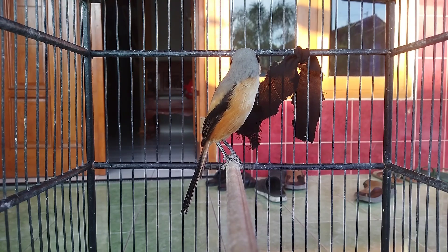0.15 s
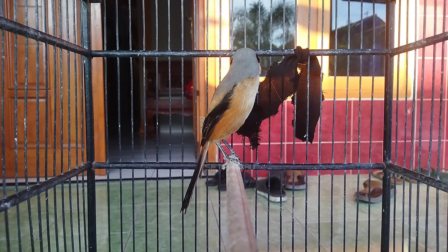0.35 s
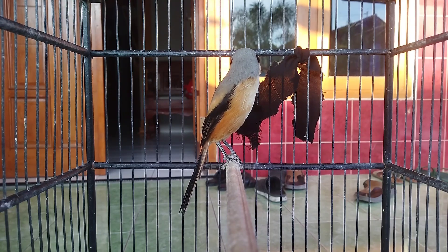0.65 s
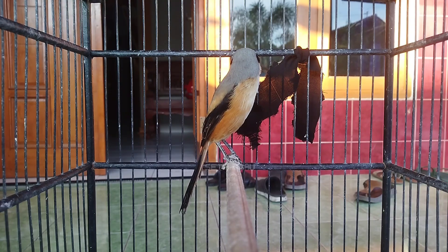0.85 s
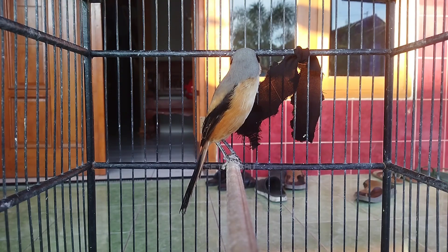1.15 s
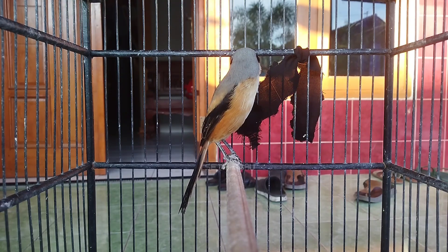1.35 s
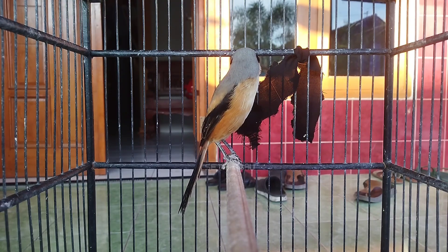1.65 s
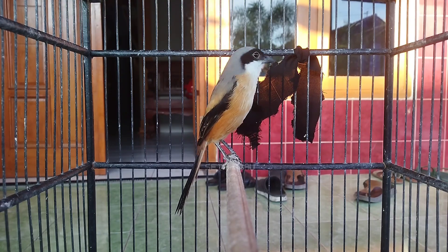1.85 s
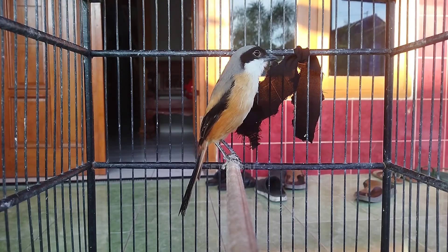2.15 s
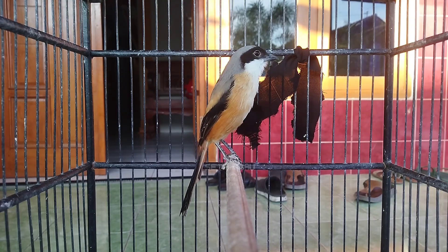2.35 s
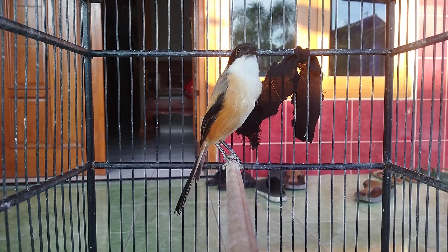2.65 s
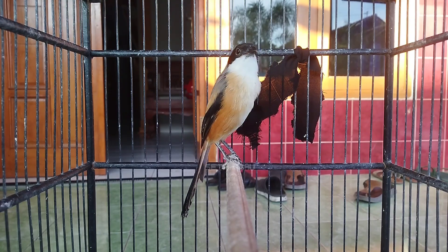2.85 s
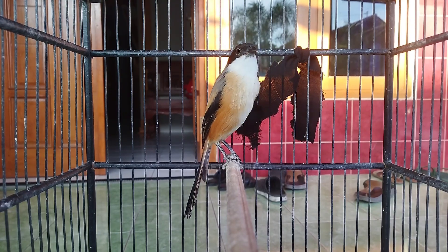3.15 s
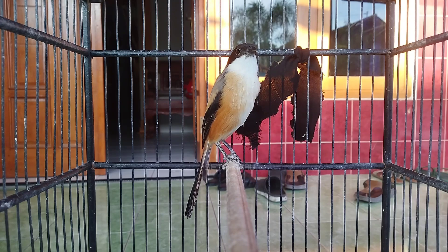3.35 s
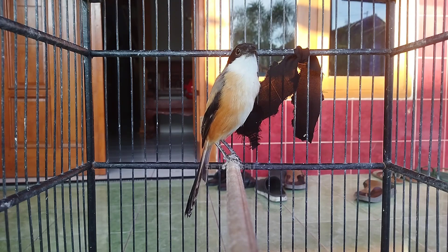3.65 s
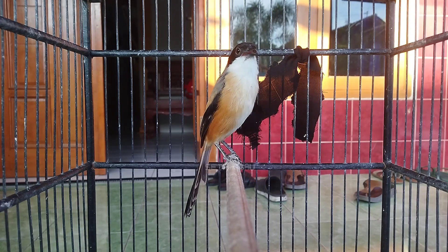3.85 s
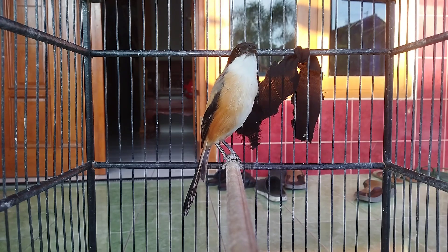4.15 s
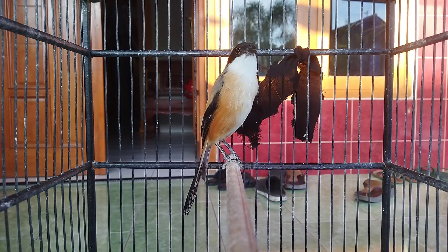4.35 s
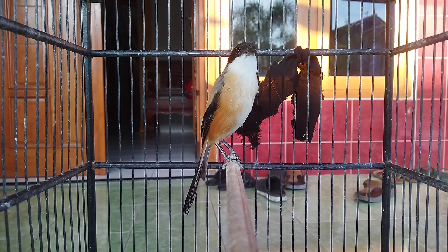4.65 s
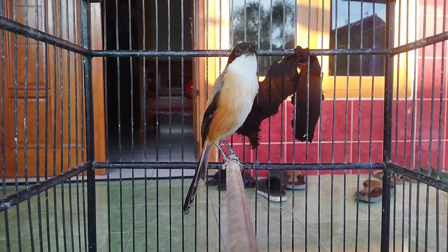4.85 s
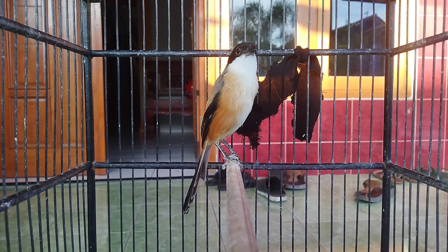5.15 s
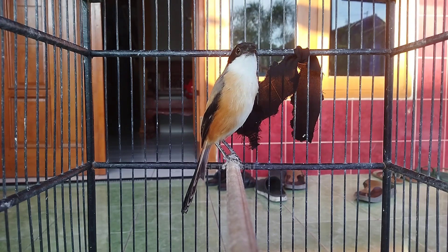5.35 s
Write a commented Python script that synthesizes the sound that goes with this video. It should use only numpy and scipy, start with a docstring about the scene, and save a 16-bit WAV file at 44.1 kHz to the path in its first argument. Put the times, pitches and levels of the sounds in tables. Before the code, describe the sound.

Beside a cage on a hard-walled porch, a low distant rumble runs throughout. A brief fizzing puff comes first, then soft dove notes from across the yard, a second sharper puff during a long rolled coo, and one last coo. Then the shrike, close and loud, gives two short harsh rasps, each ending in a rattle. Tiny clicks, feather rustles and very faint far cheeps fill the gaps.

```python
"""A caged shrike on a house porch gives two harsh rasps: each snaps open on a clear note, turns chaotic and
ends in a rattle. They are built from irregular syrinx pulses, coloured by a closing throat.
Before them come two puffs of filtered noise, like a mist sprayer, and four soft arched dove notes.
Clicks, feather rustles and far cheeps are shaped bands of noise over a low neighbourhood rumble.
The porch walls answer the rasps, puffs and clicks; the dove is heard across the yard."""
import sys
import numpy as np
from scipy import signal
from scipy.fft import rfft, irfft, next_fast_len
from scipy.io import wavfile
from scipy.ndimage import uniform_filter1d, map_coordinates

SR = 44100
rng = np.random.default_rng(int(sys.argv[2]) if len(sys.argv) > 2 else 0)


def file_out(sig):
    """Save sig as 16-bit WAV at sys.argv[1]."""
    # one column per channel
    cols = np.atleast_2d(sig).T
    # limit, then scale
    lim = np.clip(cols, -1, 1)
    pcm = np.round(lim * 32767).astype(np.int16)
    wavfile.write(sys.argv[1], SR, pcm)


N = 242991  # length of the scene in samples

# How long the porch walls ring. Each row: frequency in Hz, time to die by 60 dB in seconds.
PORCH_DECAY = [(500, .4), (1500, 0.45), (2800, 0.43), (3900, 0.45), (6000, 0.3), (13000, 0.39),
               (15500, 0.18)]


def amp(db):
    """Decibels to gain."""
    return 10 ** (np.asarray(db) / 20)


def unit(x):
    """Scale to rms 1."""
    return x / np.sqrt(np.mean(x ** 2) + 1e-20)


def along(points, hz):
    """Read a curve of (Hz, value) points on a log frequency axis."""
    f, v = np.transpose(points)
    return np.interp(np.log(hz + 1), np.log(f), v)


def add(track, s, x):
    """Mix x into the track from time s in seconds."""
    start = max(round(s * SR), 0)
    part = track[..., start:start + x.shape[-1]]
    part += x[..., :part.shape[-1]]


def wobble(rate, size):
    """A smooth random curve with rate knots a second."""
    knots = rng.standard_normal(int(size * rate / SR) + 4)
    return map_coordinates(knots, [np.arange(size) * rate / SR])


def fade(t, edge):
    """Soft start and end, each edge seconds long."""
    return np.clip(np.minimum(t - t[0], t[-1] - t) / edge, 0, 1)


def ramp(t, length):
    """Rises from 0 to 1 over the length, then stays."""
    return np.clip(t / length, 0, 1)


def filtered(x, response):
    """Multiply the spectrum of x by a response of frequency."""
    size = x.shape[-1]
    m = next_fast_len(size + SR // 4)
    return irfft(rfft(x, m) * response(np.fft.rfftfreq(m, 1 / SR)), m)[..., :size]


def resonate(x, spectrum, size=2048):
    """Minimum-phase colour: every pulse rings after it strikes, never before."""
    cepstrum = irfft(np.log(amp(along(spectrum, np.fft.rfftfreq(size, 1 / SR)))))
    # folding the cepstrum forward in time makes the filter causal
    cepstrum[1:size // 2] *= 2
    cepstrum[size // 2 + 1:] = 0
    ringing = irfft(np.exp(rfft(cepstrum)))
    return signal.fftconvolve(x, ringing)[:len(x)]


def band(size, centre_hz, octaves):
    """Stereo noise of rms 1 in a bell-shaped band."""
    noise = rng.standard_normal((2, size))
    return unit(filtered(noise, lambda f: np.exp(-(np.log2((f + 1) / centre_hz) / octaves) ** 2)))


def echo(x, decay, delay):
    """A diffuse stereo tail of noise in which each frequency dies at its own speed."""
    hz, t, z = signal.stft(rng.standard_normal((2, SR)), SR, nperseg=256)
    dying = z * amp(-60 * t / along(decay, hz)[:, None])
    tail = signal.istft(dying, SR, nperseg=256)[1]
    tail = np.pad(tail / np.linalg.norm(tail[0]), ((0, 0), (round(delay * SR), 0)))
    return signal.fftconvolve(np.atleast_2d(x), tail, axes=1)[:, :N]


def steady(x, size=700):
    """Even out slow swells, keeping the fine grain."""
    return x / np.sqrt(np.abs(uniform_filter1d(x ** 2, size)) + 1e-12)


def neighbourhood(level_db=-57.5, swell_db=1):
    """Distant traffic rumble, gently swelling, under a faint even hiss: noise with partly alike sides."""
    # Colour of the air, relative. Each row: frequency in Hz, level in dB.
    air_colour = [(15, -74), (25, -37), (48, -26), (87, -3.5), (141, 0), (301, -8.5), (344, -9.5),
                  (394, -8), (659, -19), (2000, -24), (5000, -34), (5730, -33.5), (7110, -38.5),
                  (9570, -33), (16000, -37)]
    # How far left and right move together. Each row: frequency in Hz, likeness from -1 to 1.
    likeness = [(60, 0.91), (180, 0.83), (550, 0.49), (1650, -0.08), (4970, 0.37), (15000, -0.37)]
    # Course of the rumble against the hiss. Each row: time in seconds, level in dB.
    rumble_level = [(0, 2), (.55, 1.5), (.7, 0.5), (5.5, -.5)]

    def mid_side(f):
        angle = np.arccos(np.clip(along(likeness, f), -1, 1)) / 2
        return amp(along(air_colour, f)) * [np.cos(angle), np.sin(angle)]

    mid, side = filtered(rng.standard_normal((2, N)), mid_side)
    air = unit(np.array([mid + side, mid - side]))
    rumble = filtered(air, lambda f: 1 / (1 + (f / 600) ** 4))
    hiss = air - rumble
    swell = np.interp(np.arange(N) / SR, *np.transpose(rumble_level)) + swell_db * wobble(8.1, N)
    return amp(level_db) * (rumble * amp(swell) + hiss)


def far_birds(cheep_s=.21):
    """Cheeps blurred by distance into narrow bands, and one thin high lisp from another small bird."""
    # Distant cheeps. Each row: start in seconds, level in dB, pitch in Hz.
    cheeps = [(.03, -73.5, 5700), (.24, -74.5, 5650), (.70, -76, 5800), (.78, -73.5, 3520),
              (.97, -75, 5720), (1.80, -74.5, 5720), (2.08, -75, 5780), (2.32, -74.5, 5800),
              (3.18, -76.5, 5750), (4.34, -77, 5570), (4.56, -76, 5590), (4.78, -75, 5750),
              (5.10, -78, 5650), (5.40, -75.5, 5720)]
    lisp_at_s, lisp_s, lisp_db, lisp_fade_db_per_s = 2.033, 0.15, -62.5, 70
    out, size = np.zeros((2, N)), round(cheep_s * SR)
    for s, db, hz in cheeps:
        add(out, s, amp(db) * band(size, hz, octaves=0.062) * np.sqrt(np.abs(np.hanning(size))))
    t = np.arange(0, lisp_s, 1 / SR)
    lisp = band(len(t), 10000, octaves=0.26) * fade(t, 0.023)
    add(out, lisp_at_s, amp(lisp_db - lisp_fade_db_per_s * t) * lisp)
    return out


def puffs(sputter_db=2.0, spread_db=-5, porch_db=-12):
    """Short sputtering jets of mist: the fine fizz fades with the pressure while the lower rush holds better."""
    # Each row: start in seconds, length in seconds, fizz level in dB, rush level in dB,
    # surge (or, if negative, lag) of the opening jet's fizz in dB.
    puff_rows = [(0.15, .118, -42.5, -51, -4.5), (1.475, .119, -40, -47.5, 3.5)]
    # Relative colour of the fine fizz. Each row: frequency in Hz, level in dB.
    fizz_colour = [(3000, -31), (4700, -6.5), (6500, -8), (7900, -14), (9200, -7.5), (11200, -11),
                   (12000, 2.5), (12700, -7.5), (13600, -1.5), (15400, -8)]
    # Relative colour of the lower rush. Each row: frequency in Hz, level in dB.
    rush_colour = [(120, -38), (400, -5), (1100, -8), (2100, -2.5), (3500, -3), (4600, -1), (6000, -14),
                   (9000, -35)]
    surge_s = .025  # how fast the jet settles
    fizz_fade_db, rush_fade_db = 15.5, 3.5  # lost by the end, as the pressure runs out
    out = np.zeros((2, N))
    for s, length, fizz_db, rush_db, surge_db in puff_rows:
        t = np.arange(0, length, 1 / SR)
        spent = (t / length) ** 3
        sputter = sputter_db * wobble(350, len(t))
        fizz = fizz_db + surge_db * np.exp(-t / surge_s) - fizz_fade_db * spent
        rush = rush_db - rush_fade_db * spent
        for db, colour in (fizz, fizz_colour), (rush, rush_colour):
            # noise shared by both sides, plus some of each side's own
            jet = rng.standard_normal(len(t)) + amp(spread_db) * rng.standard_normal((2, len(t)))
            jet = unit(filtered(jet, lambda f: amp(along(colour, f))))
            add(out, s, jet * amp(db + sputter) * fade(t, 0.0018))
    walls = echo(out, PORCH_DECAY, delay=0.009)
    walls = filtered(walls, lambda f: amp(along([(4000, 2.0), (12000, -2.5)], f)))
    return out + amp(porch_db) * walls


def ticks(t60=.014, porch_db=-12):
    """Dry little clicks, some at the edges of the puffs, and a low thump as the second rasp starts."""
    # Each row: start in seconds, nominal peak in dB, centre in Hz.
    tick_rows = [(0.167, -36.5, 2997), (0.234, -34.5, 4700), (1.509, -28.5, 9000), (1.582, -35, 2997),
                 (2.559, -34, 2200), (2.858, -34, 5505), (3.894, -28, 450)]
    out, t = np.zeros((2, N)), np.arange(SR // 20) / SR
    for s, db, hz in tick_rows:
        # noise peaks above its rms, so the rms starts 5.5 dB below the nominal peak; it dies by 60 dB in t60 seconds
        add(out, s, band(len(t), hz, octaves=1.6) * amp(db - 5.5 - 60 * t / t60))
    return out + amp(porch_db) * echo(out, PORCH_DECAY, delay=.008)


def arch(length, top_hz, db, fall_s, roll, dip_db):
    """The course of a dove note: it scoops up, holds or rolls, and sinks."""
    rise_s, rise_hz, fall_hz = 0.016, 180, 159.3
    attack_s, attack_db, fall_db = .021, 15, 12.5  # it swells in, and weakens as it sinks
    roll_from_s, roll_until_s, roll_edge_s = .052, 0.32, 0.02  # when within a note the throat rolls
    choke_db, recover_s = 14, .22  # a full roll chokes the note at first
    dip_at, dip_width = .56, .11  # as shares of the note
    t = np.arange(0, length, 1 / SR)
    fall = ramp(t - length + fall_s, fall_s) ** 2
    pitch = top_hz - rise_hz * np.exp(-t / rise_s) - fall_hz * fall
    roll_in = ramp(t - roll_from_s + roll_edge_s / 2, roll_edge_s)
    roll_out = ramp(roll_until_s + roll_edge_s / 2 - t, roll_edge_s)
    depth = roll * roll_in * roll_out
    edges = attack_db * (1 - ramp(t, attack_s)) + fall_db * fall ** 2
    dip = dip_db * np.exp(-((t / length - dip_at) / dip_width) ** 2)
    choke = choke_db * depth * (1 - ramp(t, recover_s))
    return t, pitch, db - edges - dip - choke, depth


def dove(roll_hz=46, roll_bend=.07, yard_db=-8):
    """Nearly pure arched notes, the long one rolled by a throat flutter, heard across the yard."""
    # Each row: start in seconds, length in seconds, top pitch in Hz, level in dB,
    # length of the closing fall in seconds, throat roll from 0 to 1, dip in the middle in dB.
    coos = [(.545, .083, 725.4, -45.5, .06, 0.06, 12), (.836, .213, 737.7, -45.5, 0.059, .05, 13),
            (1.269, .386, 724.4, -45.5, .26, .95, -0.5), (2.22, .152, 685.7, -46, .07, .05, 2.5)]
    # How long the yard rings. Each row: frequency in Hz, time to die by 60 dB in seconds.
    yard_decay = [(500, 0.91), (6000, 0.17)]
    voice = np.zeros(N)
    for s, *shape in coos:
        t, pitch, db, depth = arch(*shape)
        roll_rate = roll_hz * (1 + .22 * wobble(45, len(t)))
        roll = np.clip(depth, 0, 1) * np.sin(2 * np.pi * np.cumsum(roll_rate) / SR)
        # each beat of the roll lifts pitch and loudness together
        bend = 1 + roll_bend * (roll - depth / 2) + 0.0019 * wobble(55, len(t))
        phase = 2 * np.pi * np.cumsum(pitch * bend) / SR
        note = unit((1 + 0.49 * roll) * np.sin(phase))
        add(voice, s, amp(db) * note * fade(t, 0.002))
    return voice + amp(yard_db) * echo(voice, yard_decay, delay=0.014)


def rustles():
    """The bird shifts its feathers: soft swells of broad noise."""
    # Each row: start in seconds, level in dB, centre in Hz, length in seconds.
    rustle_rows = [(2.114, -73.5, 9000, 0.1), (2.376, -73, 10100, .08), (2.847, -58, 11050, .04),
                   (3.681, -70.5, 5500, 0.12), (4.93, -81, 9500, .4)]
    out = np.zeros((2, N))
    for s, db, hz, length in rustle_rows:
        size = round(length * SR)
        add(out, s, amp(db) * band(size, hz, octaves=1.095) * np.hanning(size))
    return out


def effort(length, db, pitch, rough, break_s, push, closing_s, fade_db_per_s):
    """The course of a rasp: clear note, harsh stretch with open bill, then a fading rattle as the bill closes."""
    attack_s, attack_db = .004, 20  # every rasp snaps open
    note_s, note_hz, note_db, note_rough, note_gape = .0105, 1736.5, 3, .22, .6  # the clear opening note
    scoop_hz, scoop_s = 219.5, .003  # it scoops up to its pitch
    crack_rough, crack_s = .55, .022  # share of the missing roughness added as it cracks, and how fast it settles
    sag_db_per_s = 18  # loss of pressure while the bill is open
    climb_hz_per_s, sink_hz_per_s = 400, 1200  # pitch creeps up before the break and sinks after it
    break_db, break_hz, break_settle_s = 2, 190.7, .025  # a full push at the break
    rattle_open, rattle_shut, break_rough = 0.37, .6, .42  # flutter before and after the break, added roughness
    release_s, release_db, release_hz = .016, 8.5, 382  # level and pitch drop at the end
    t = np.arange(0, length, 1 / SR)
    note = 1 - ramp(t - note_s + attack_s / 2, attack_s)
    since = np.maximum(t - break_s, 0)  # time since the break
    before = t - since  # time spent before the break
    broken = ramp(since, attack_s)
    release = ramp(t - length + release_s, release_s)
    db = db - attack_db * (1 - ramp(t, attack_s)) + note_db * note - sag_db_per_s * before
    db = db + break_db * push * broken - fade_db_per_s * since - release_db * release
    pitch = pitch + climb_hz_per_s * before - sink_hz_per_s * since
    pitch = pitch + break_hz * push * broken * np.exp(-since / break_settle_s) - release_hz * release
    crack = crack_rough * np.exp(-np.abs(t - note_s) / crack_s)
    rough = rough + (1 - rough) * crack + break_rough * broken
    rattle = rattle_open + (rattle_shut - rattle_open) * broken
    gape = .5 - .5 * np.tanh(2 * (t - break_s) / closing_s)
    scooped_hz = note_hz - scoop_hz * np.exp(-t / scoop_s)

    def opening(first, later):
        return note * first + (1 - note) * later

    return (t, db, opening(scooped_hz, pitch), opening(note_rough, rough),
            opening(0, rattle), opening(note_gape, gape))


def pulses(pitch, scatter, size_db, count=8):
    """One sharp pulse per cycle, scattered in time (cycles) and size (dB)."""
    phase = np.cumsum(pitch) / SR
    cycle = np.arange(1, int(phase[-1]))
    shift, strength = rng.standard_normal((2, len(cycle)))
    at = np.interp(cycle + shift * np.interp(cycle, phase, scatter), phase, np.arange(len(phase)))
    size = amp(strength * np.interp(cycle, phase, size_db))
    # a windowed sinc places each pulse between samples
    taps = at.astype(int)[:, None] + np.arange(1 - count, count + 1)
    offset = taps - at[:, None]
    shape = size[:, None] * np.sinc(offset) * np.sinc(offset / count)
    return np.bincount(np.clip(taps, 0, len(phase) - 1).ravel(), shape.ravel(), len(phase))


def syrinx(pitch, rough, scatter=0.06, waver=.06, lurch=.04, size_db=4):
    """One side of the voice organ: its beat lurches, wavers and scatters as it is driven harder."""
    wander = waver * wobble(900, len(pitch)) + lurch * wobble(110, len(pitch))
    return unit(pulses(pitch * np.exp(rough * wander), scatter * rough, size_db * rough))


def throat(source, gape, count=5):
    """Resonances that mostly sink and darken as the bill closes, blended from a few bill positions."""
    # Each row: open-bill frequency in Hz, its level in dB, shut-bill frequency in Hz, its level in dB.
    throat_peaks = [(760, -41, 610, -48.5), (1090, -22.5, 980, -21.5), (1380, -23.5, 1170, -18.5),
                    (1630, -14.5, 1550, -12.5), (2120, -29.5, 1950, -18.5), (2410, -8.5, 2480, -3),
                    (3230, -5.5, 3050, -0.5), (3840, 0, 3550, -7), (4418, -2.5, 4150, -14),
                    (4817, -20, 4600, -26), (5600, -14, 4700, -22), (6050, -22.5, 5700, -30.5),
                    (6700, -16.5, 7000, -25), (7290, -22, 5500, -31), (9100, -11, 9900, -31),
                    (10300, -22, 10000, -30), (10900, -37, 12000, -40.5), (11796, -16, 11700, -27.5),
                    (13700, -10.5, 13000, -21), (15000, -17.5, 13500, -34.5), (16000, -38, 13000, -55)]
    open_hz, open_db, shut_hz, shut_db = np.transpose(throat_peaks)
    voice = 0
    for g in np.linspace(0, 1, count):
        colour = np.transpose([shut_hz + g * (open_hz - shut_hz), shut_db + g * (open_db - shut_db)])
        share = np.maximum(1 - np.abs(gape - g) * (count - 1), 0)
        voice = voice + share * unit(resonate(source, colour))
    return voice


def rasp(course, edge_db, interval=1.14, second_side=1.8, turbulence=0.9, fundamental_db=-6,
         rattle_hz=260, rattle_open_hz=400, rattle_db=7):
    """The two sides of the syrinx clash at different pitches, and a slower flutter chops their sound."""
    t, db, pitch, rough, rattle, gape = course
    rough, rattle, gape = np.clip([rough, rattle, gape], 0, 1)
    size = len(t)
    beats = syrinx(pitch, rough) + rough ** 2 * second_side * syrinx(interval * pitch, rough)
    # the membranes put more into their overtones than into the fundamental
    beats = filtered(beats, lambda f: amp(along([(1500, fundamental_db), (2200, 0)], f)))
    source = beats + turbulence * rough ** 2 * rng.standard_normal(size)
    source = filtered(source, lambda f: amp(along([(4500, 0.002), (12000, edge_db)], f)))
    # the flutter slows as the bill closes
    flutter_hz = (rattle_hz + (rattle_open_hz - rattle_hz) * gape) * np.exp(.3 * wobble(250, size))
    flutter = np.cumsum(flutter_hz) / SR
    source = source * amp(rattle_db * rattle * np.cos(2 * np.pi * flutter))
    return steady(throat(source, gape), size=400) * amp(db) * fade(t, 0.00078)


def shrike(cage_db=-5, porch_db=-15):
    """The call reaches each port with its own colour; the cage scatters it at once and the porch walls later."""
    # Each row: start in seconds, length in seconds, base level in dB, base pitch in Hz,
    # base roughness from 0 to 1, time until it breaks into a rattle in seconds, push at the break from 0 to 1,
    # bill closing time in seconds, fade of the rattle in dB/s, pulse sharpness as treble in dB.
    rasp_rows = [(2.572, .186, -14.5, 1280, .56, .118, .5, .09, 24, 0.1),
                 (3.887, .227, -14.5, 1305, .32, .121, 0.96, .075, 78, 1.4)]
    # How the call divides between the microphone ports.
    # Each row: frequency in Hz, left over right in dB, left lead in radians.
    ports = np.array([(700, -1, 1), (1582, 4, 0.2), (2690, -3.5, 1.1), (3070, 10, 0.95), (3280, 0, 0.07),
                      (3840, -0.5, 1.5), (4520, -10.5, 2), (5300, 0.5, 3.5), (6670, 8.5, 1.9), (9300, 5, 2),
                      (10800, 1.5, 2.8), (13300, 2.5, 5.5), (15020, 1, 3)])
    voice, cage = np.zeros(N), np.zeros((2, N))
    for s, *shape, edge_db in rasp_rows:
        call = rasp(effort(*shape), edge_db)
        add(voice, s, call)
        # the head turns between calls, so each is scattered differently
        add(cage, s, echo(call, [(1000, .03)], delay=0.000981))
    side = np.array([[1], [-1]])

    def port_response(f):
        level = amp(side * along(ports[:, :2], f) / 2)
        lead = np.exp(1j * side * along(ports[:, ::2], f) / 2)
        return level * lead

    direct = filtered(voice, port_response)
    wall_colour = [(1500, 2.5), (2800, 1.5), (4000, 3), (6000, 6.5), (13000, -1.0)]  # (Hz, dB)
    walls = filtered(echo(voice, PORCH_DECAY, delay=.008), lambda f: amp(along(wall_colour, f)))
    return direct + amp(cage_db) * cage + amp(porch_db) * walls


def scene():
    """Everything heard from beside the cage."""
    return neighbourhood() + far_birds() + puffs() + ticks() + dove() + rustles() + shrike()


def record(dry, ceiling=.85, top_hz=15900):
    """The recorder rounds off the tallest peaks and keeps nothing above its band limit."""
    rounded = dry / (1 + (dry / ceiling) ** 6) ** (1 / 6)
    return filtered(rounded, lambda f: f < top_hz)


dry = scene()
out = record(dry)
file_out(out)
```